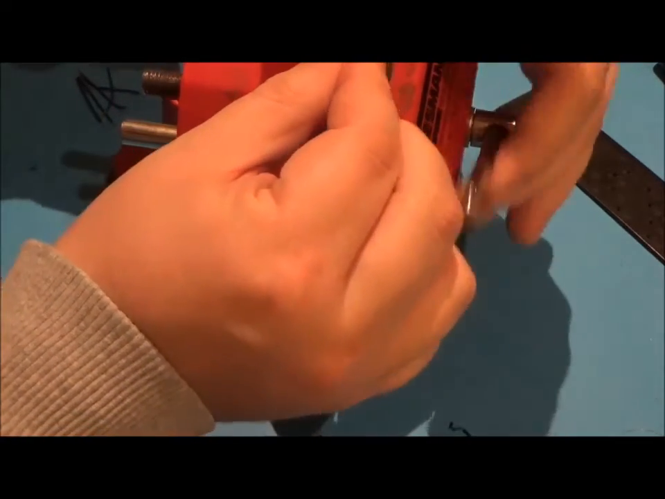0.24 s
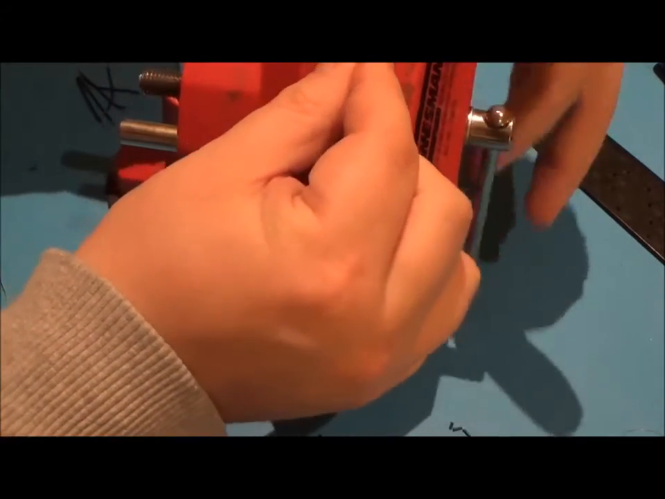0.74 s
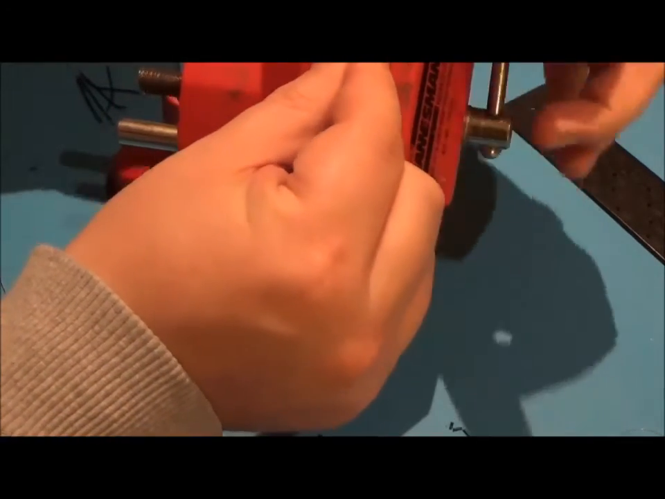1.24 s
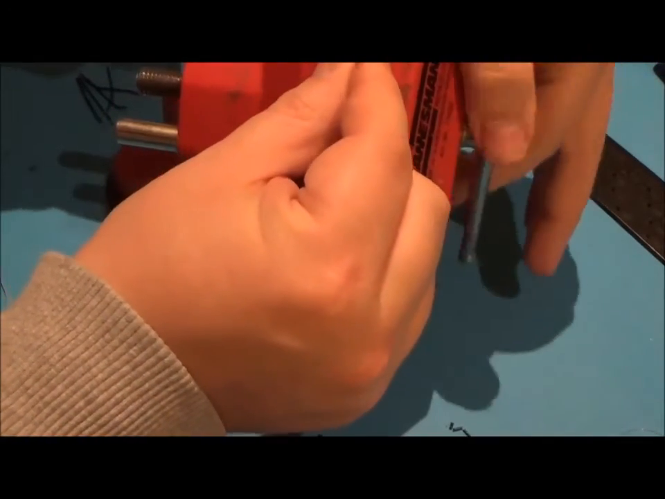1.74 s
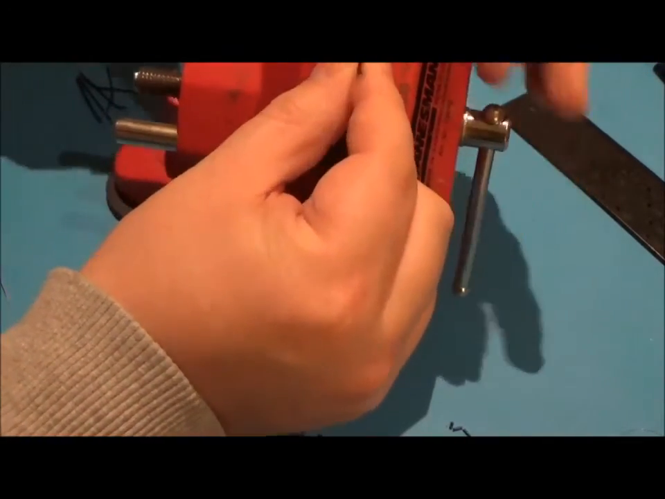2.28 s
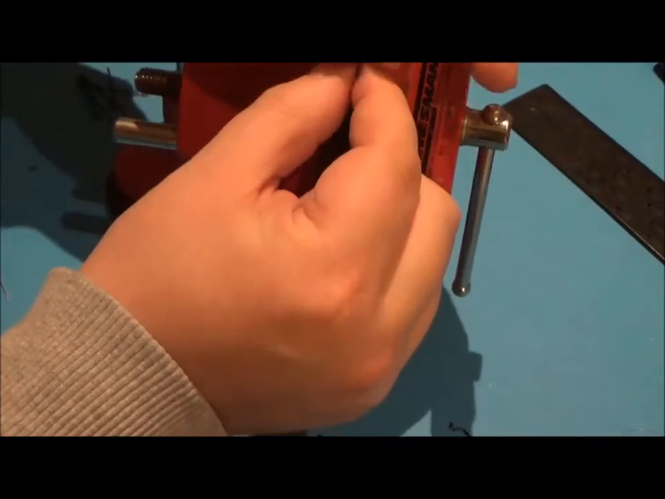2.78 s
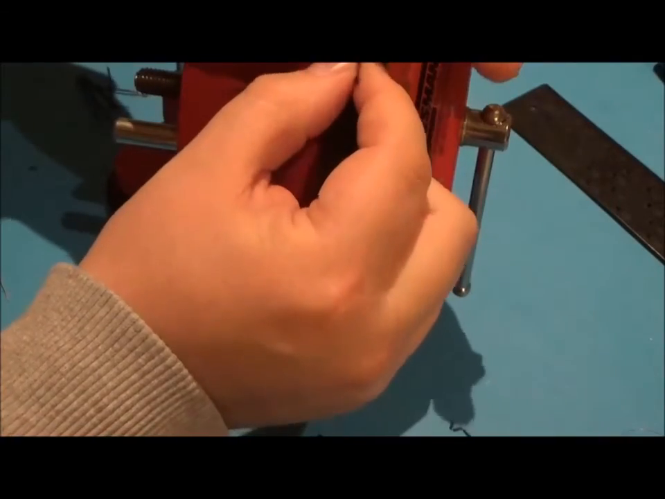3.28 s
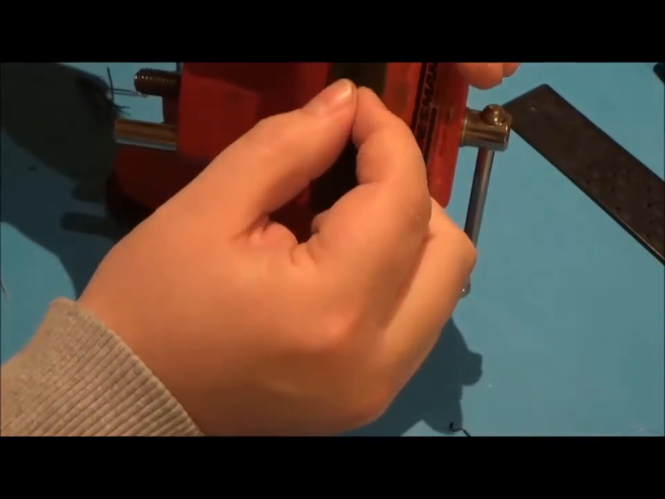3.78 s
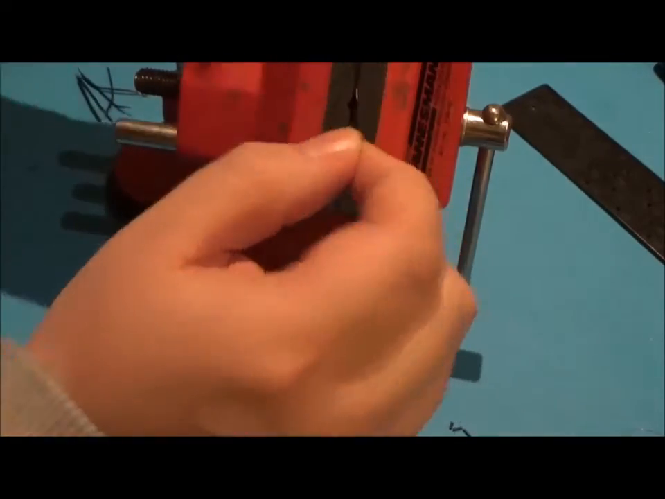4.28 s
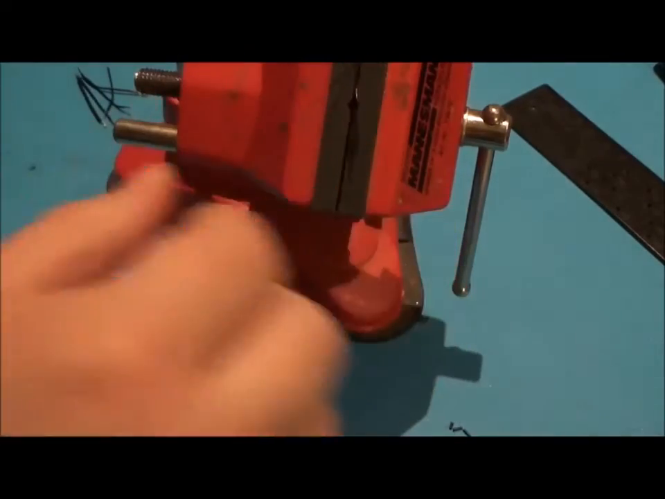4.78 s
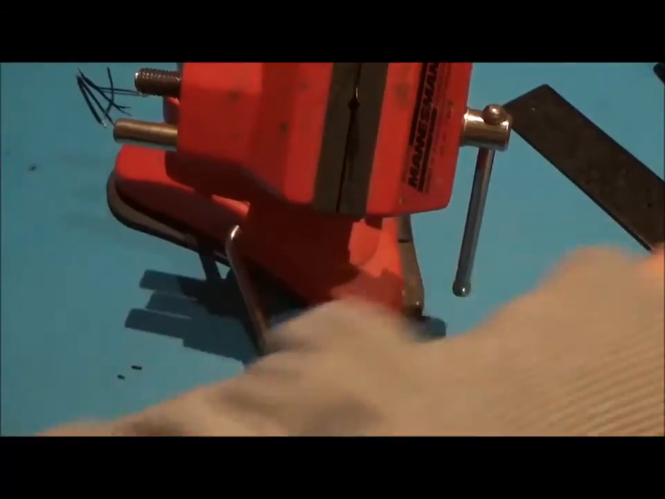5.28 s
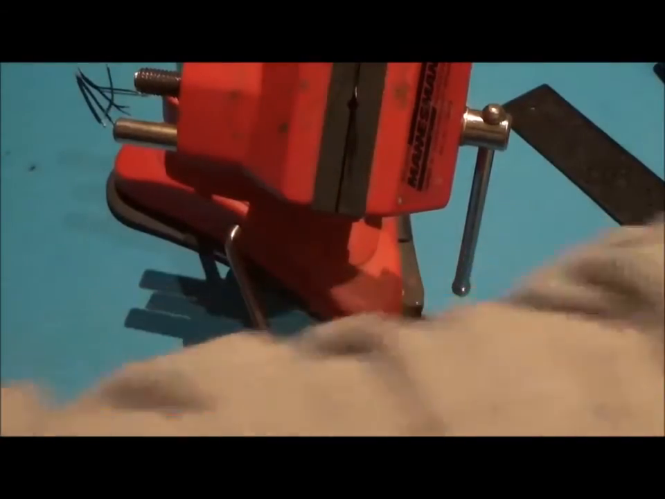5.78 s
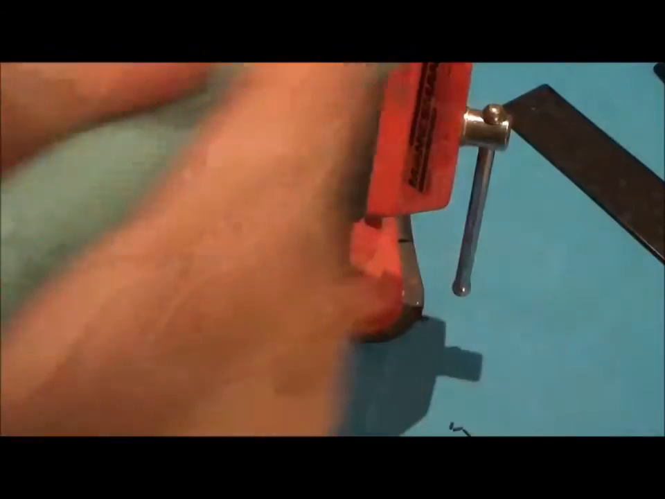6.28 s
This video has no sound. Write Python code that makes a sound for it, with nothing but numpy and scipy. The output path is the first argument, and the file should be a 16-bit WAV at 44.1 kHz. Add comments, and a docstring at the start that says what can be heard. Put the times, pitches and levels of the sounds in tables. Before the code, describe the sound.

For the first 2.2 seconds a small bench vise is wound shut. Its loose sliding handle drops and rattles in uneven metallic clicks and clacks that briefly ring the iron body and the bench top, loudest at about 0.7 and 1.1 seconds. A lull follows, with faint rubbing of fingers on metal from about 3.5 seconds. Around 4.9 seconds a small tool ticks and scrapes in short pushes. A sleeve brushes softly past from 5 seconds, and a sharp tick stands out at 5.5. Near 5.8 a tool rasps out of a wire holder, which rings lightly. Dull bumps with a slight clack hit the bench at 6.3 and 6.5 seconds. Soft room hiss, a thin steady tone and a faint pulsing electronic whine lie underneath throughout. The stereo microphone is close, in a small room with short reflections.

```python
"""A workbench in a small room, stereo microphone close to a small vise that is being wound shut.
Its loose sliding handle drops and rattles in the screw head, ringing the iron body and the bench top.
Then fingers shift their grip, small tools tick and scrape, a sleeve brushes past and something bumps
the bench. Behind it all lie room hiss, a thin steady tone and a faint pulsing electronic whine."""
import sys
import numpy as np
from scipy import signal
from scipy.fft import rfft, irfft
from scipy.io import wavfile
from scipy.ndimage import uniform_filter1d

SR = 44100
rng = np.random.default_rng(int(sys.argv[2]) if len(sys.argv) > 2 else 0)


def wrap_up_sound(samples):
    """Save the sound to the file named by the first command line argument, as 16-bit audio."""
    columns = np.atleast_2d(samples).T
    # keep every value between -1 and 1, then stretch to whole-number steps
    tamed = np.clip(columns, -1, 1)
    steps = np.round(tamed * 32767).astype(np.int16)
    wavfile.write(sys.argv[1], SR, steps)


N = 287973


def amp(db):
    """Decibels to gain."""
    return 10 ** (np.asarray(db) / 20)


def unit_rms(x):
    """Scales to rms 1."""
    return x / np.sqrt(np.mean(x ** 2) + 1e-20)


def curve_at(points, hz):
    """Interpolates (f/Hz, value) points on a log-frequency axis."""
    f, value = np.transpose(points)
    return np.interp(np.log(hz + 1), np.log(f + 1), value)


def pan(db):
    """Channel gains with the left db above the right."""
    return amp([[db / 2], [-db / 2]])


def add(mix, start, sound, pan_db=0):
    """Places a sound in the stereo mix, start seconds in."""
    part = mix[:, max(round(start * SR), 0):][:, :len(sound)]
    part += pan(pan_db) * sound[:part.shape[1]]


def wander(rate):
    """Smooth random drift of rms 1 that changes about rate times a second."""
    hz = np.fft.rfftfreq(N, 1 / SR)
    return unit_rms(irfft(rfft(rng.standard_normal(N)) * np.exp(-(hz / rate) ** 2), N))


def click(colour, size=2048):
    """The shortest causal click with this spectrum."""
    hz = abs(np.fft.fftfreq(size, 1 / SR))
    log_gain = np.log(amp(curve_at(colour, hz)))
    minimum_phase = np.exp(np.conj(signal.hilbert(log_gain)))
    return np.fft.ifft(minimum_phase).real


def favour(modes, pitch_hz, depth_db, octaves):
    """Where a blow lands decides which modes it wakes: those near its pitch shift by up to depth_db."""
    hz, db, t60 = np.transpose(modes)
    near = np.exp(-(np.log2(hz / pitch_hz) / octaves) ** 2)
    return np.transpose([hz, db + depth_db * near, t60])


def ring(modes, choke_s, linger_db, detune):
    """Modes choked while the parts still touch, then lingering faintly."""
    t = np.arange(SR // 3) / SR
    hz, db, t60 = np.transpose(modes)[:, :, None]
    shift = 1 + detune * rng.standard_normal(hz.shape)  # contact pulls each mode off its pitch
    phase = rng.uniform(0, 2 * np.pi, hz.shape)
    choked = np.exp(-t / choke_s) * np.sin(2 * np.pi * hz * shift * t + phase)
    free = amp(linger_db - 60 * t / t60) * np.sin(2 * np.pi * hz * t + phase)
    onset = 1 - np.exp(-2 * hz * t)  # a mode builds up within its first cycle
    return (amp(db) * (choked + free) * onset).sum(0)


def contact(chatter_s, rattle, size=2048):
    """The force of one impact, then a chatter of tiny rebounds that swells and dies."""
    age = np.arange(size) / SR / max(chatter_s, 1e-4)
    force = rng.standard_normal(size) ** 3 * np.sqrt(age) * np.exp(-age)
    force *= rattle / np.linalg.norm(force)
    force[0] += 1
    return force


def strike(force, response, db):
    """A force through a response; db is the level of its loudest 4 ms."""
    sound = signal.fftconvolve(force, response)
    power = uniform_filter1d(sound ** 2, size=176, mode="constant").max()
    return amp(db) * sound / np.sqrt(power)


# likeness of the microphone's two channels: f/Hz, correlation
STEREO_LIKENESS = [(50, 1), (250, 0.72), (1000, 0.4), (3000, 0.48), (6000, 0.51), (10000, 0.78)]

def noise(colour):
    """Coloured stereo noise of rms 1, mostly alike in both channels."""
    hz = np.fft.rfftfreq(N, 1 / SR)
    a, b = rfft(rng.standard_normal((2, N)))
    likeness = np.clip(curve_at(STEREO_LIKENESS, hz), 0, 1)
    mid, side = np.sqrt(1 + likeness) * a, np.sqrt(1 - likeness) * b
    return unit_rms(irfft(np.array([mid + side, mid - side]) * amp(curve_at(colour, hz)), N))


def rub(colour, strokes, lean, grain_db, grain_rate, pan_db):
    """Friction: hiss that follows each stroke's speed, catching and slipping; lean < 1 peaks early."""
    t = np.arange(N) / SR
    speed = np.zeros(N)
    for start, length, db in strokes:
        during = (t > start) & (t < start + length)
        progress = (t[during] - start) / length
        speed[during] += amp(db) * np.sin(np.pi * progress ** lean)
    grain = unit_rms(amp(grain_db * wander(grain_rate)))
    return noise(colour) * grain * speed * pan(pan_db)


# spectrum of the room's air: f/Hz, relative level/dB
AIR_COLOUR = [(25, -13.5), (60, -7), (150, -3.5), (300, -3.5), (500, -5), (750, -5), (1100, -3), (1800, -7),
              (2700, -11), (3800, -13.5), (6000, -16.5), (11000, -19)]

def room_tone():
    """The steady hiss of the room around the microphone."""
    return amp(-56) * noise(AIR_COLOUR)


def tone(hz, db, drift_rad, drift_rate):
    """A thin tone whose phase drifts."""
    phase = 2 * np.pi * hz * np.arange(N) / SR + drift_rad * wander(drift_rate)
    return amp(db) * np.sqrt(2) * np.sin(phase)


def pulses(centre_s, width_s, rate_hz=25):
    """A smooth blip of gain once in every cycle."""
    offset = ((np.arange(N) / SR - centre_s) * rate_hz + .5) % 1 - .5
    return np.exp(-(offset / rate_hz / width_s) ** 2)


def whine():
    """Faint electronics: a steady tone and two higher ones that pulse together."""
    steady = tone(702.3, db=-62.5, drift_rad=0.85, drift_rate=4.5)
    middle = tone(2078, db=-56.5, drift_rad=0.403, drift_rate=43) * pulses(0.0299, width_s=0.00573)
    upper = tone(3300, db=-67, drift_rad=0.93, drift_rate=72) * pulses(0.031, width_s=0.003)
    return steady + middle + upper


# decay of the room's reflections: f/Hz, t60/s
ROOM_DECAY = [(250, 0.08), (700, 0.39), (1800, 0.29), (4600, 0.4), (10000, 0.28)]
# their spectrum: f/Hz, gain/dB
REFLECTION_COLOUR = [(150, -10.5), (500, -5), (950, -7), (1500, -7.5), (2300, -2), (2900, -6.5),
                     (4200, -12.5), (6500, -7), (10000, -11)]

def room(direct, wet_db, width=0.463):
    """Direct sound plus the dense reflections of a small room, each band dying at its own speed."""
    hz, t, bands = signal.stft(rng.standard_normal((2, SR // 2)), SR, nperseg=256)
    decay = amp(-60 * t / curve_at(ROOM_DECAY, hz)[:, None])
    tail = signal.istft(bands * decay, SR, nperseg=256)[1]
    tail *= np.clip(np.arange(tail.shape[1]) / SR / 0.00079 - 1, 0, 1)  # echoes arrive a little later
    tail /= np.linalg.norm(tail, axis=1, keepdims=True)
    tail = signal.fftconvolve(tail, click(REFLECTION_COLOUR)[None], axes=1)
    mid, side = signal.fftconvolve(direct.mean(0)[None], tail, axes=1)[:, :N]
    return direct + amp(wet_db) * np.array([mid + width * side, mid - width * side])


# modes of the bench top: f/Hz, level/dB, t60/s
BENCH_MODES = [(115, -8, .18), (180, -8, .18), (248, -6, .2), (320, -5, .18), (415, -8, .15), (495, 2, .16),
               (590, -9, .15), (720, -9, .12), (826, -3, .15), (915, -7, .18), (1190, -10, .15),
               (1450, -9, .1), (1660, -7, .14)]
# spectrum of an arm rubbing on the bench: f/Hz, level/dB
ARM_COLOUR = [(40, -43), (95, -1.5), (200, -4.5), (400, -5.5), (900, -6.5), (1600, -7.5), (3000, -11),
              (6000, -17)]
# its shifts: t/s, length/s, level/dB
ARM_STROKES = [(0, 2.06, -58), (4.044, 1.03, -59.5), (4.83, 0.22, -54.5), (5.162, 1.3, -58),
               (5.694, 0.33, -49.5), (5.926, 1.16, -53.5)]

def arm():
    """An arm shifts on the bench and sets its top ringing softly."""
    friction = rub(ARM_COLOUR, ARM_STROKES, lean=0.52, grain_db=2, grain_rate=25, pan_db=0.24)
    modes = favour(BENCH_MODES, pitch_hz=155, depth_db=5, octaves=1)
    top = ring(modes, choke_s=0.015, linger_db=-20, detune=0.004)
    resonance = signal.fftconvolve(friction.mean(0), top)[:N]
    return friction + amp(-8.5) * friction.std() * unit_rms(resonance)


# spectrum of skin on metal: f/Hz, level/dB
SKIN_COLOUR = [(300, -15), (900, -34), (1600, 10), (2400, 4.5), (3400, -2), (5000, -8), (11000, -26)]
# changes of grip: t/s, length/s, level/dB
GRIP_STROKES = [(3.5, 0.46, -57.5), (4.05, 1, -63.5)]

def fingers():
    """Skin rubs on metal as the fingers shift on the work."""
    return rub(SKIN_COLOUR, GRIP_STROKES, lean=0.7, grain_db=2.6, grain_rate=60, pan_db=1)


# spectrum of brushing cloth: f/Hz, level/dB
SLEEVE_COLOUR = [(180, -65.5), (300, 2), (382, -3.5), (647, -14), (708, -6.5), (1020, -2.5), (1130, -12),
                 (2260, -5.5), (5100, -4), (6300, -12.5), (11000, -7), (14300, -48), (22000, -120)]
# passes of the sleeve: t/s, length/s, level/dB
SLEEVE_STROKES = [(0, .11, -53.5), (.45, 0.37, -66), (1.31, .14, -61.5), (2.27, 0.12, -61),
                  (4.15, 0.47, -67.5), (4.503, 0.17, -59), (5.055, 0.78, -50), (5.874, 0.33, -54),
                  (6.215, .16, -55)]

def sleeve():
    """Cloth brushes softly past the microphone."""
    return rub(SLEEVE_COLOUR, SLEEVE_STROKES, lean=0.79, grain_db=1, grain_rate=82, pan_db=1)


# spectrum of a sliding tool: f/Hz, level/dB
SLIDE_COLOUR = [(300, -34), (1200, -21), (2200, -9), (3400, -12), (4200, 0), (5150, 1), (6100, -18),
                (8500, -12), (11000, -15)]
# its pushes: t/s, length/s, level/dB
SLIDE_STROKES = [(4.85, 0.068, -45), (4.921, 0.051, -41), (4.959, 0.064, -39.5)]

def tool_slide():
    """A tool scrapes along in short pushes, just left of centre."""
    return rub(SLIDE_COLOUR, SLIDE_STROKES, lean=0.85, grain_db=1.3, grain_rate=130, pan_db=1.5)


# spectrum of a tool rasping on its holder: f/Hz, level/dB
DRAW_COLOUR = [(500, -14), (1500, -1.5), (2800, -13), (4300, -5), (6200, -12.5), (7100, -8), (7600, 3),
               (8300, -11), (9300, -6), (11000, -18)]
# its pulls: t/s, length/s, level/dB
DRAW_STROKES = [(5.707, 0.07, -46), (5.763, 0.046, -41.5), (5.799, 0.06, -37.5), (5.84, 0.1, -46.5)]

def tool_draw():
    """A tool rubs out of its holder in quick, smooth pulls."""
    return rub(DRAW_COLOUR, DRAW_STROKES, lean=0.38, grain_db=0, grain_rate=180, pan_db=-0.5)


# spectrum of a hard contact with the bench: f/Hz, level/dB
CLACK_COLOUR = [(300, -22.5), (900, -2), (1700, 7.5), (2400, -4), (3800, -6), (5300, -13), (6600, -41),
                (11000, -15)]
# bumps on the bench: t/s, level/dB, f/Hz, clack over bump/dB
BENCH_BUMPS = [(1.252, -47, 390, -9), (1.681, -51, 390, -20), (2.11, -44, 415, -17), (5.725, -52, 110, -25),
               (5.809, -46, 202, -22), (6.299, -36, 790, -3), (6.304, -34, 477, -4.5),
               (6.312, -38, 292, -16), (6.491, -34.5, 530, -13)]
BENCH_CHATTER_S = 0.0027

def bench_bumps():
    """Dull bumps ring the bench top; harder ones also clack."""
    out = np.zeros((2, N))
    for start, db, pitch_hz, clack_db in BENCH_BUMPS:
        modes = favour(BENCH_MODES, pitch_hz, depth_db=8.5, octaves=0.29)
        top = ring(modes, choke_s=0.013, linger_db=-18, detune=0.01)
        add(out, start, strike(contact(BENCH_CHATTER_S, rattle=0.096), top, db))
        add(out, start, strike(contact(BENCH_CHATTER_S, rattle=1.6), click(CLACK_COLOUR), db + clack_db))
    return out


# spectra of a tool's low clack, its tick and its bright edge: f/Hz, level/dB
LOW_COLOUR = [(150, -36), (700, -13), (1300, -6), (2000, 11), (2700, -7.5), (5000, -40), (11000, -53)]
TICK_COLOUR = [(500, -30.5), (1700, -8.5), (2700, 2.5), (3600, 1.5), (4800, 1), (6000, -15), (11000, -10)]
EDGE_COLOUR = [(2000, -42.5), (6000, -33), (7600, -4), (8800, 4.5), (11000, 9.5)]
# modes of the wire tool holder: f/Hz, level/dB, t60/s
HOLDER_MODES = [(1140, -13, .2), (1600, -8, .25), (2040, -2, .12), (2200, 1, .18), (2400, 1, .12),
                (2640, 2, .18), (3020, -1, .18), (3300, -4, .15), (3600, -7, .15), (4290, -8, .2),
                (5700, -7, .15), (7150, -10, .1), (7375, -8, .15), (7690, -9, .2), (9200, -11, .15)]
# tools touch: t/s, level/dB, edge over tick/dB, chatter/s, left over right/dB, holder over tick/dB
TOOL_TOUCHES = [(4.846, -44.5, -8, 0.0021, 4, -25), (4.8515, -32.5, 1.5, 0.0024, 2.1, -25),
                (4.9224, -30.5, 3.5, .0021, 3, -17), (5.018, -39.5, -7, 0.00064, 4, -27),
                (5.0312, -43.5, -1, 0.0016, 1, -28), (5.435, -35, 2, 0.00087, 2.5, -34),
                (5.5095, -24.5, 2, 0.0012, 2.5, -22), (5.705, -35, -29, 0.00055, -7, 5),
                (5.765, -45, 2, .001, -5, 5.5), (5.802, -32, 0, 0.0016, -2.3, -9.5),
                (6.235, -46, 4, 0.0017, 1, -26)]

def tool_ticks():
    """Dry ticks of small tools; some set the wire holder ringing."""
    out = np.zeros((2, N))
    for start, db, edge_db, chatter_s, pan_db, holder_db in TOOL_TOUCHES:
        force = contact(chatter_s, rattle=1)
        low_db = -9 - 0.45 * edge_db  # the duller a tick, the more it clacks
        holder = ring(HOLDER_MODES, choke_s=0.0032, linger_db=-19.5, detune=0.014)
        add(out, start, strike(force, click(LOW_COLOUR), db + low_db), pan_db)
        add(out, start, strike(force, click(TICK_COLOUR), db), pan_db)
        add(out, start, strike(force, click(EDGE_COLOUR), db + edge_db), pan_db)
        add(out, start, strike(force, holder, db + holder_db), pan_db)
    return out


def rebounds(rattle_s, first_gap_s=0.0055, shrink=0.9, count=6):
    """A loose part bounces ever faster and weaker: rows of delay/s, level/dB."""
    delay = np.r_[0, np.cumsum(first_gap_s * shrink ** np.arange(count))]
    db = -20 / np.log(10) * delay / max(rattle_s, 1e-4)
    return np.transpose([delay, db])[db > -20]


# modes of the iron body on its base, the screw head and the steel handle: f/Hz, level/dB, t60/s
BODY_MODES = [(492, -10, .27), (579, -5, .3), (779, -4, .26), (820, -8, .26), (896, -7, .24), (950, 3, .32),
              (993, -6, .22), (1080, -6, .08), (1195, -4, .25), (1300, -6, .1), (1391, -4, .22),
              (1599, -10, .16), (1906, -8, .2), (2120, -7, .12), (2308, -5, .32), (2423, -8, .3),
              (2620, -13, .1)]
HEAD_MODES = [(3000, 1, .1), (2840, 2, 0.105), (3680, 1, 0.17), (3970, -4, .1), (4380, -4.5, .1),
              (4740, 0.5, 0.089), (5360, -6, .1), (5460, -0.5, .15), (5890, -9, .1), (7300, -4, 0.098)]
HANDLE_MODES = [(7700, -5, .12), (8130, -4, .15), (8550, -10, .08), (8940, -10, .08), (9305, 5, .38),
                (9643, -8, .18), (9937, -4, .2), (10250, -6, .08), (10650, -5, .15), (10900, -1, .12)]
# the handle knocks on the vise: t/s, level/dB, f/Hz, hardness (handle ping over body)/dB, rattle/s
HANDLE_KNOCKS = [(0.008, -37.5, 1060, -21, .002), (0.036, -41.5, 2050, -32, 0.0045),
                 (0.2257, -29, 1410, -10, 0.0079), (0.309, -31, 950, -31, .002),
                 (0.317, -34.5, 1270, -17, 0.012), (0.33, -40, 1030, -1, .002),
                 (0.355, -44.5, 1660, -10, .002), (0.432, -33, 830, -29, .002),
                 (0.688, -22, 1035, 3.5, .002), (0.6904, -26, 1030, -11, .002),
                 (0.811, -43, 1090, -26, 0.0017), (0.8189, -36, 1240, -34, .002),
                 (0.958, -40.5, 1532, 3, .002), (0.9649, -36, 1640, -37, .002),
                 (1.002, -39.5, 1700, -2, .002), (1.0134, -30.5, 1720, 3.5, .002),
                 (1.0461, -29, 1300, -35, .002), (1.058, -25.5, 2078, -4, 0.0016),
                 (1.072, -39.5, 945, -24, .002), (1.2233, -46.5, 880, -26, .002),
                 (2.0573, -35, 1090, -15.5, .002), (2.082, -37, 1697, -9, .002),
                 (2.1055, -30.5, 1110, -10, 0.013), (2.1163, -38, 1180, -2, .002),
                 (2.132, -38, 1640, -10, .002), (2.197, -40.5, 1010, -11.5, .002)]

def vise():
    """Close up, each knock rings the iron body and the bench; hard ones add more screw head and handle."""
    out = np.zeros((2, N))
    for start, db, pitch_hz, hardness_db, rattle_s in HANDLE_KNOCKS:
        pitch_ratio = pitch_hz / 1115  # against a blow of middle pitch
        head_db = -4.5 + 0.45 * hardness_db + 5 * np.log2(pitch_ratio)  # more for hard, high blows
        head_hz = 3540 * pitch_ratio ** 0.38  # follows the blow's pitch in part
        head_modes = favour(HEAD_MODES, head_hz, depth_db=7, octaves=0.12)
        body_modes = favour(BODY_MODES, pitch_hz, depth_db=8, octaves=0.32)
        top_modes = favour(BENCH_MODES, pitch_hz=507, depth_db=8, octaves=0.3)
        top = ring(top_modes, choke_s=0.0043, linger_db=-22, detune=0.0078)
        add(out, start, strike(contact(BENCH_CHATTER_S, rattle=0.19), top, db - 19.5))
        for delay, bounce_db in rebounds(rattle_s):
            ping_hz = 9500 * (1 + 0.026 * rng.standard_normal())
            ping_modes = favour(HANDLE_MODES, ping_hz, depth_db=-0.5, octaves=0.11)
            force = contact(chatter_s=0.0016, rattle=2.3)
            body = ring(body_modes, choke_s=0.0025, linger_db=-24, detune=0.012)
            head = ring(head_modes, choke_s=0.0012, linger_db=-48, detune=0.02)
            ping = ring(ping_modes, choke_s=0.0015, linger_db=-43, detune=0.0012)
            add(out, start + delay, strike(force, body, db + bounce_db))
            add(out, start + delay, strike(force, head, db + bounce_db + head_db))
            add(out, start + delay, strike(force, ping, db + bounce_db + hardness_db), pan_db=-2.64)
    # so small a body radiates hardly any bass
    return signal.sosfilt(signal.butter(2, 300, "high", fs=SR, output="sos"), out)


def scene():
    """Knocks, ticks and bumps with their reflections, and dry rubbing, over room tone and whine."""
    hits = room(vise(), wet_db=-1.5) + room(tool_ticks(), wet_db=1.5) + room(bench_bumps(), wet_db=-0.3)
    rubbing = tool_slide() + tool_draw() + sleeve() + arm() + fingers()
    return hits + rubbing + room_tone() + whine()


def record(dry):
    """The microphone chain cuts the treble steeply at 11130 Hz."""
    lowpass = signal.firwin(301, 11130, window=("kaiser", 7), fs=SR)
    return signal.oaconvolve(dry, lowpass[None], "same")


dry = scene()
out = record(dry)
wrap_up_sound(out)
```